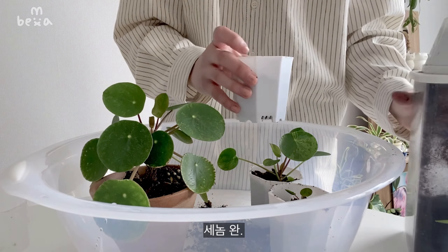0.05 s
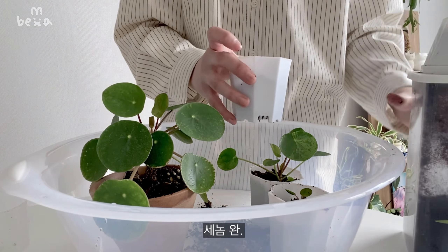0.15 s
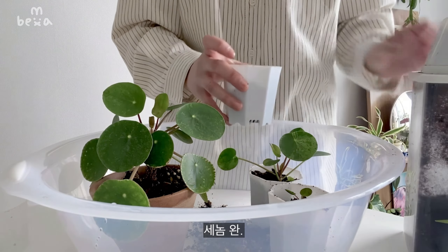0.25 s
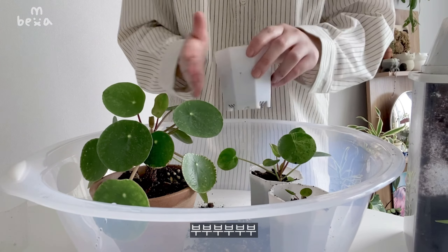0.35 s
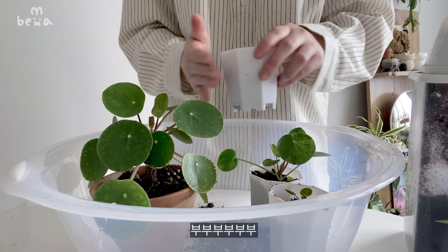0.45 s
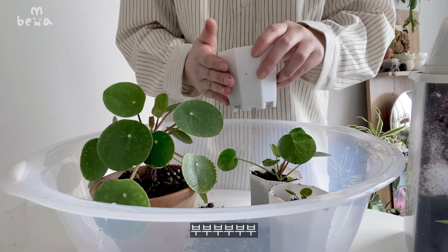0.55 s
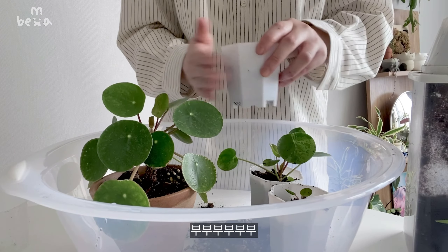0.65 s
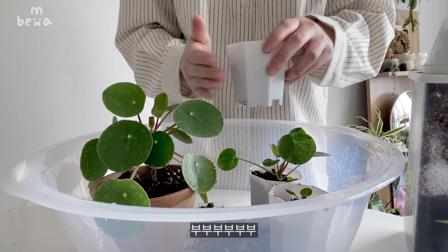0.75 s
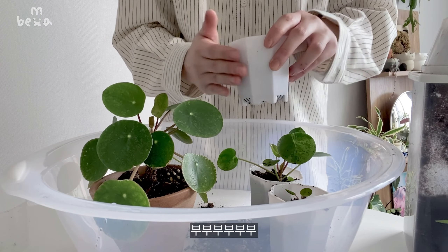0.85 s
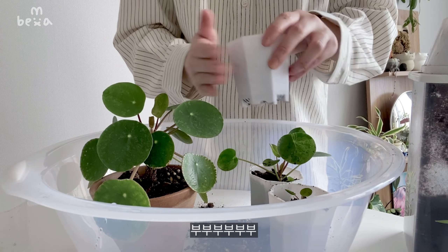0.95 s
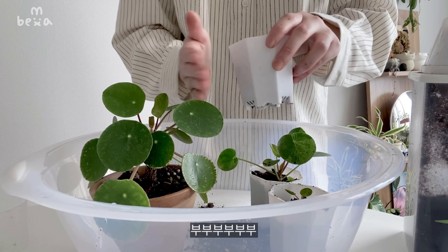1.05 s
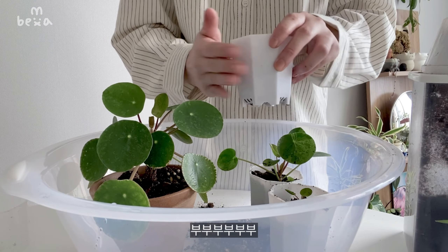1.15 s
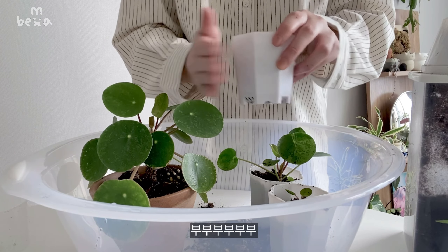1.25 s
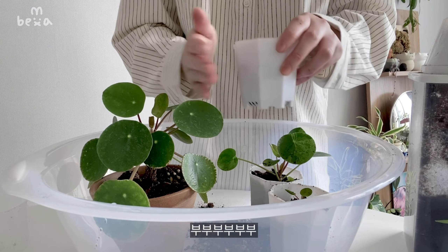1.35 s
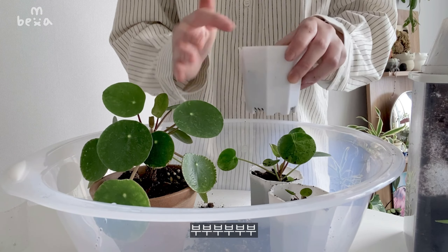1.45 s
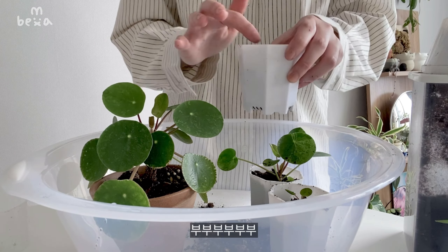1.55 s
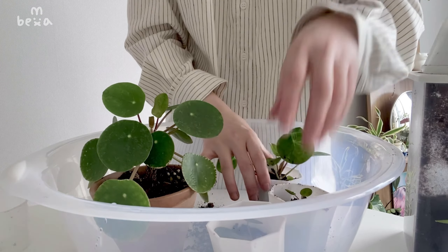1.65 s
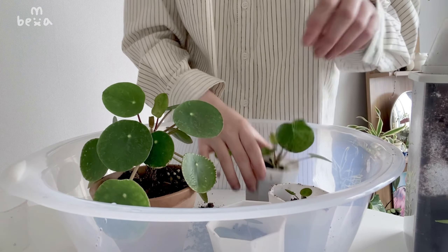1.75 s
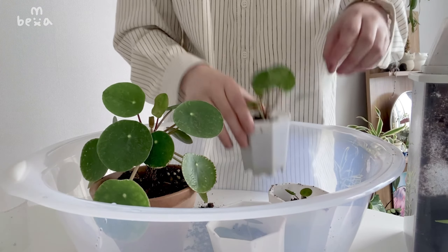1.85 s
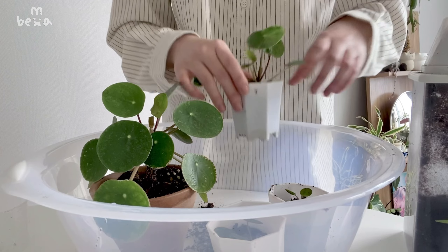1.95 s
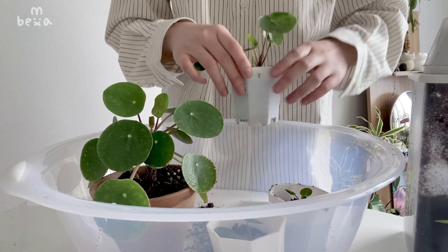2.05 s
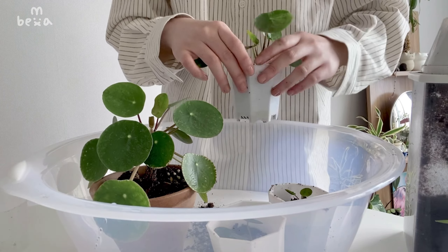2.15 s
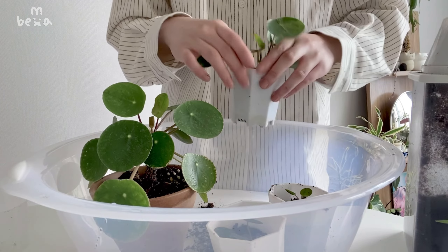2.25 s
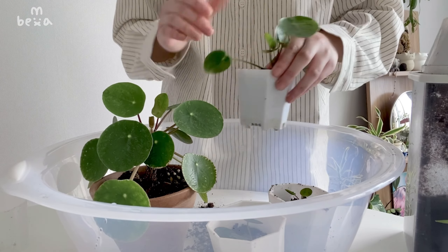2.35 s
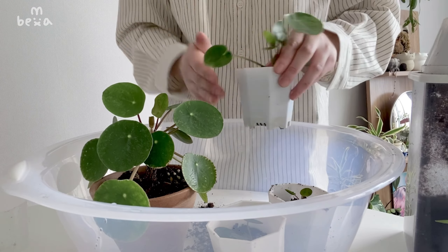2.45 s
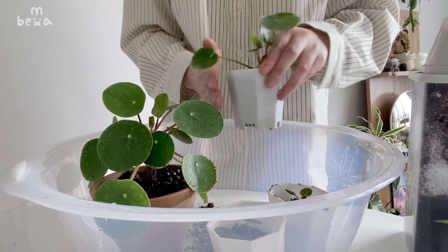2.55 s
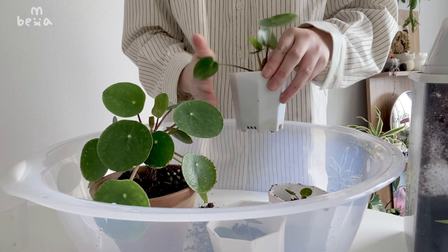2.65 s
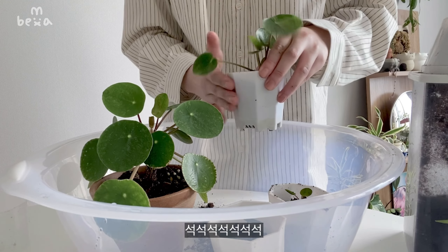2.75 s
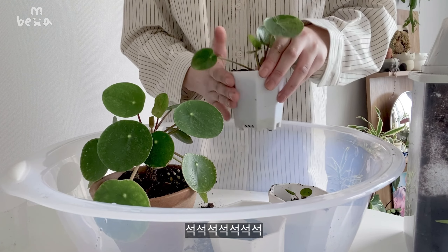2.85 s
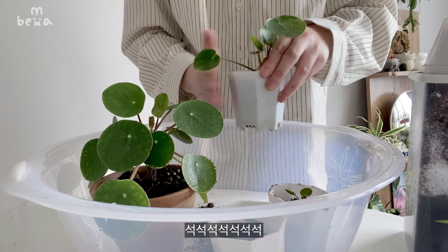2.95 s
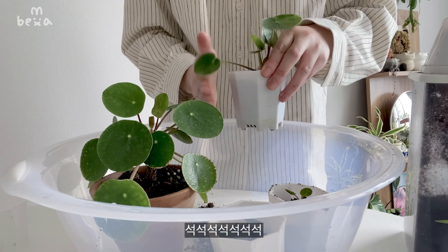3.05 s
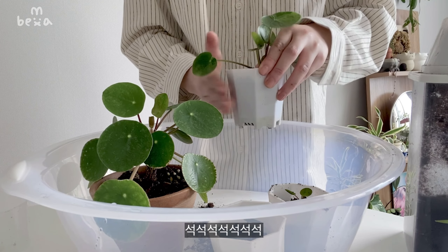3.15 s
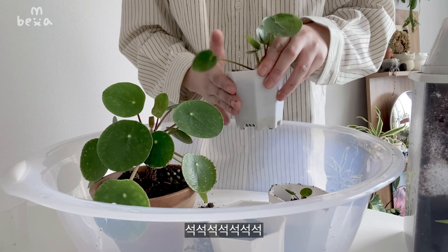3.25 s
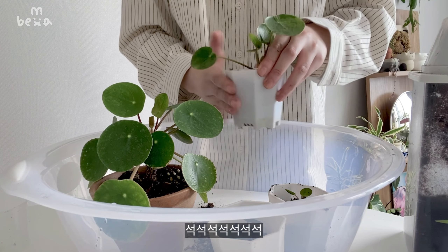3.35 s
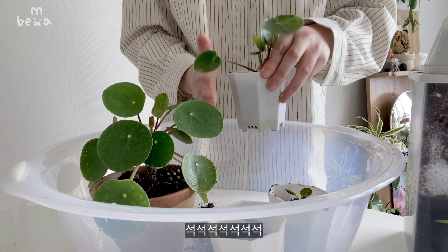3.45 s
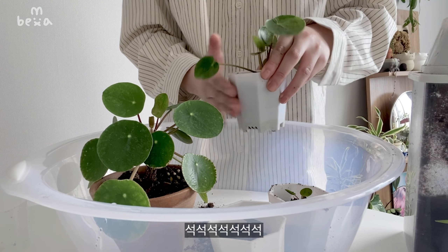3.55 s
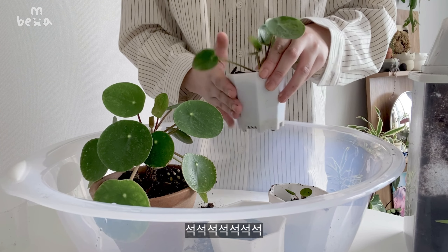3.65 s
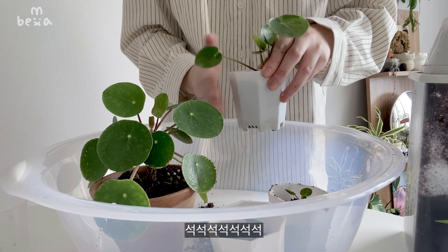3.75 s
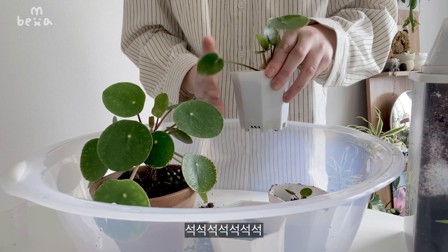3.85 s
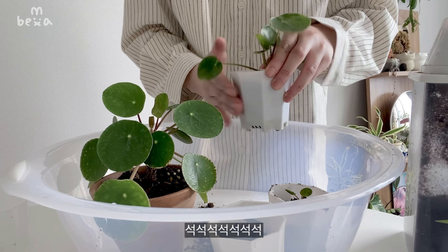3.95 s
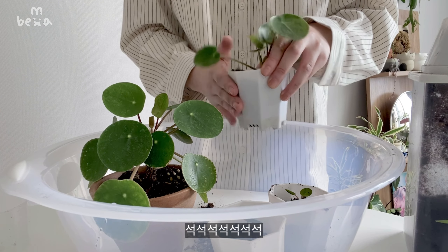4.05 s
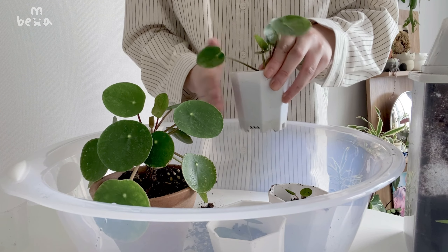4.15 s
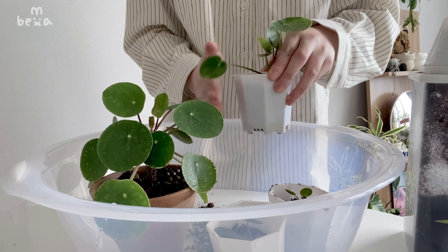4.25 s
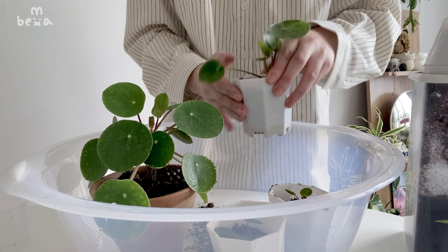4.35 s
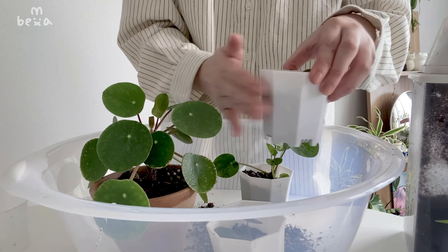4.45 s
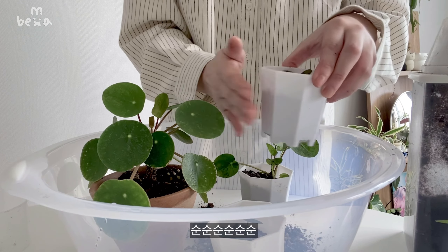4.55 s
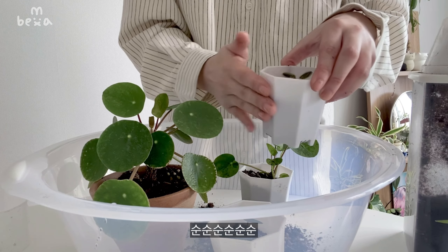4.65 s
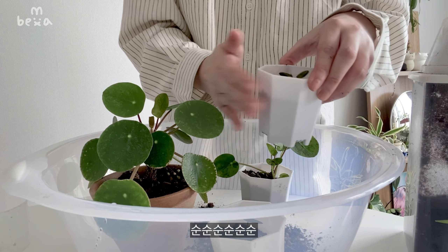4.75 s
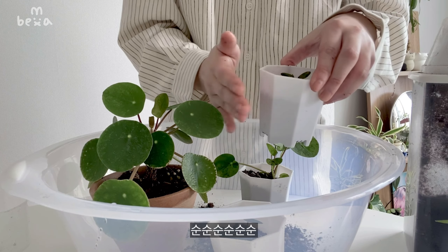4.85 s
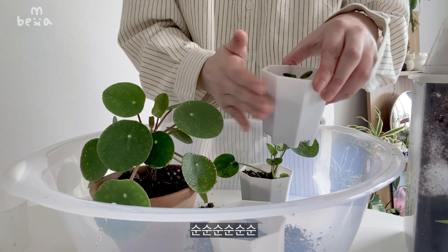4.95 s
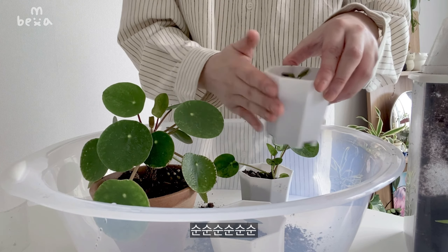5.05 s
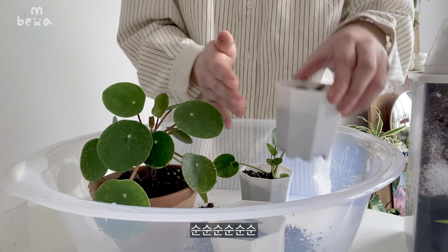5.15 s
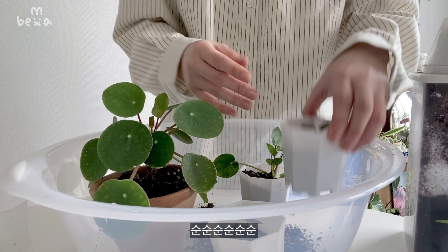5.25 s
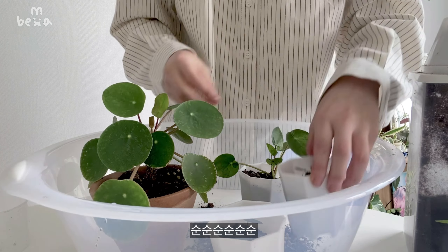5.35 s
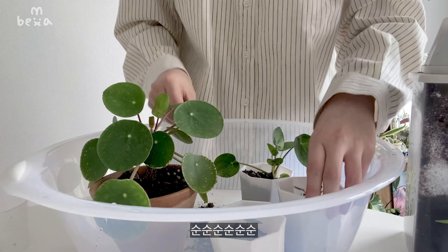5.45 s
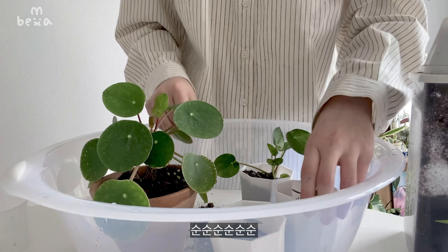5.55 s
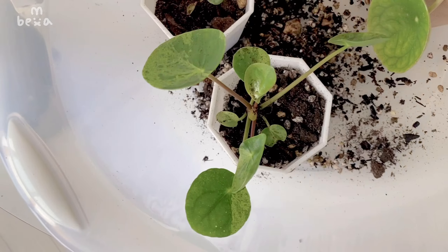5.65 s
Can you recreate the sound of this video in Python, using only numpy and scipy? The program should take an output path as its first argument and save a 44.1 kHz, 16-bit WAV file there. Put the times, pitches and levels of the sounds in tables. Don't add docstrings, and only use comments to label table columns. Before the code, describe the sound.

Hands tap small plastic plant pots in quick, even runs, dry soil rattling inside, with basin knocks before and a set-down thud after.

```python
import sys
import numpy as np
from scipy import signal
from scipy.fft import rfft, irfft
from scipy.io import wavfile
from scipy.ndimage import uniform_filter1d

SR = 44100
rng = np.random.default_rng(int(sys.argv[2]) if len(sys.argv) > 2 else 0)


def convert_level_to_amplitude(level_db):
    exponent = np.asarray(level_db, float) / 20
    return 10 ** exponent


def put_to_file(sound):
    columns = np.atleast_2d(sound).T
    safe = np.clip(columns, -1, 1)
    whole_steps = np.round(safe * 32767)
    wavfile.write(sys.argv[1], SR, whole_steps.astype(np.int16))


N = 250558
T = np.arange(N) / SR


def unit(x):
    return x / np.sqrt(np.mean(x ** 2))


def colour(x, shape):
    hz, db = np.transpose(shape)
    log_grid = np.log(np.linspace(1, SR / 2, 2049))
    cepstrum = irfft(np.interp(log_grid, np.log(hz), db) * np.log(10) / 20)
    cepstrum[1:2048] *= 2
    cepstrum[2049:] = 0
    response = irfft(np.exp(rfft(cepstrum)))
    return signal.fftconvolve(x, response / np.linalg.norm(response))[:len(x)]


def band(x, hz, width_hz):
    return signal.lfilter(*signal.iirpeak(hz, hz / width_hz, fs=SR), x)


def add(out, start_s, x):
    i = int(start_s * SR)
    out[i:i + len(x)] += x[:N - i]


def decay(t60_s, t):
    return convert_level_to_amplitude(-60 * t / t60_s)


def rise(rise_s, t):
    return np.clip(t / rise_s, 0, 1)


def ring(hz, t60_s, t):
    return np.sin(2 * np.pi * hz * t) * decay(t60_s, t)


def walk(rate_hz):
    k = int(SR / rate_hz)
    steps = np.repeat(rng.standard_normal(N // k + 1), k)
    return unit(uniform_filter1d(steps, k)[:N])


def ears(x, echo, apart, lead=6):
    left = np.roll(x, lead) + apart[0]
    right = np.roll(x, 2 * lead) * np.sqrt(1 - echo ** 2) + echo * x + apart[1]
    return np.array([left, right])


def reverb(x, t60_s, db):
    t = T[:SR // 2]
    tails = rng.standard_normal((2, len(t))) * decay(t60_s, t) * rise(0.01, t)
    tails /= np.linalg.norm(tails[0])
    return convert_level_to_amplitude(db) * signal.fftconvolve(x[None], tails, axes=1)[:, :N]


# (start_s, pitch_hz, level_db)
DRONE_PATH = [(0.0, 59.5, -58), (0.301, 55.5, -62), (0.56, 70.3, -62), (1.55, 71.3, -58),
              (1.738, 74.2, -64.5), (1.849, 62.6, -63.5), (1.972, 76.1, -60.5), (2.358, 76.4, -61.5),
              (2.48, 72.13, -72.5), (2.6, 74, -62), (2.83, 67.3, -57.5), (3.309, 67, -57.5),
              (3.4, 76.2, -58), (3.649, 72, -57.5), (3.86, 57, -57), (4.3, 61.2, -62), (4.65, 68.4, -58),
              (5.6, 72.9, -61.5)]
# (pitch_hz, width_hz)
WHINE_BAND = (1860, 70)
# (pitch_hz, level_db)
HISS_TONE = [(12, -36.5), (20, -24), (64, 2), (157, -11.5), (196, -6), (333, -20), (650, -19.5), (707, -20),
             (768, -15), (1130, -20.5), (1270, -25.5), (2930, -37.5), (3970, -37.5), (15600, -44)]
SCENE_HISS_DB = [0.1, 0.1, -1.6, 0.16, 0.3]
SCENE_STARTS = (0.4, 1.63, 2.7, 4.45)


def room_tone():
    start_s, hz, db = np.transpose(DRONE_PATH)
    throb = convert_level_to_amplitude(np.interp(T, start_s, db) + 3 * walk(12))
    pitch_hz = np.interp(T, start_s, hz) + 1.5 * walk(9)
    drone = np.sqrt(2) * throb * np.sin(2 * np.pi * np.cumsum(pitch_hz) / SR)
    drone = np.array([drone * convert_level_to_amplitude(-2.86), np.roll(drone, 30) * convert_level_to_amplitude(-5.0)])

    hiss = np.array([colour(rng.standard_normal(N), HISS_TONE) for _ in range(2)])
    hiss[1] = hiss[1] + band(hiss[0] - hiss[1], 60, 220)
    lift_db = np.take(SCENE_HISS_DB, np.digitize(T, SCENE_STARTS))
    hiss = convert_level_to_amplitude(-66.5 + lift_db + 1.3 * walk(7.4)) * hiss

    whine = [convert_level_to_amplitude(-86 + 4.2 * walk(4.3)) * unit(band(rng.standard_normal(N), *WHINE_BAND)) for _ in range(2)]
    return drone + hiss + whine


# (pitch_hz, level_db)
RUMBLE_TONE = [(40, -23.5), (120, -4), (300, 5), (800, -0.5), (1400, -7.5), (2500, -29.5), (4000, -44),
               (6000, -70.5), (16000, -71)]
# (pitch_hz, level_db)
CLICK_TONE = [(500, -11.5), (1500, 1.5), (4500, 0), (7000, -18), (16000, -25)]


def knocks(table, rumble_db, rumble_t60_s, push_s):
    body, rumble, click = np.zeros((3, N))
    t = T[:SR // 2]
    for start_s, db, hz, t60_s, click_db in table:
        push = np.sin(np.pi / 2 * rise(push_s, t)) ** 2
        add(body, start_s, convert_level_to_amplitude(db) * ring(hz, t60_s, t) * push)
        add(rumble, start_s, convert_level_to_amplitude(db + rumble_db) * decay(rumble_t60_s, t) * rng.standard_normal(len(t)))
        add(click, start_s, convert_level_to_amplitude(db + click_db) * decay(0.011, t) * rng.standard_normal(len(t)))
    return body + colour(rumble, RUMBLE_TONE) + colour(click, CLICK_TONE)


# (start_s, peak_db, pitch_hz, t60_s, click_db relative to the peak)
BASIN_KNOCKS = [(.001, -36, 193, 0.057, -28.5), (.004, -34, 625, 0.065, -31.5),
                (.010, -34, 1152, 0.042, -33), (.021, -23.5, 722, 0.019, -41),
                (.030, -37, 308, 0.048, -37.5), (.047, -32.5, 279, .05, -46),
                (.075, -31.5, 200, 0.02, -49.5), (.1180, -26, 559, 0.025, -38),
                (.1225, -28, 150, 0.04, -58), (.1295, -19.5, 761, 0.027, -49),
                (.1300, -43, 1244, 0.035, -31.5), (.1360, -21.5, 399, 0.04, -41),
                (.1240, -48, 136.4, 0.55, -48.5), (.158, -45, 412, 0.053, -39),
                (.192, -44.5, 213, 0.11, -34), (.258, -47, 299, 0.074, -22.5), (.297, -44, 380, 0.061, -34),
                (1.81, -55, 200, 0.047, -14), (2.325, -59, 228, .06, -12)]
EARLIER_KNOCK = [
    (0, -39.5, 340, .12, -23),
]


def basin_knocks():
    return knocks(BASIN_KNOCKS, -14.5, 0.092, 0.0017) + knocks(EARLIER_KNOCK, 5.0, 0.24, 0.0015)


# (start_s, peak_db, pitch_hz, t60_s)
CRUMB_TICKS = [(0.0044, -34, 2530, 0.014), (0.027, -69, 2770, 0.013), (0.06, -70, 2480, 0.03),
               (0.2642, -62, 2720, 0.05), (0.278, -64.5, 2970, 0.053), (0.4537, -45, 3400, 0.069),
               (0.4945, -45, 3900, 0.026), (0.635, -38.5, 3840, 0.039), (0.6544, -45.5, 2750, 0.044),
               (0.7726, -49, 3930, 0.03), (0.794, -55.5, 2612, 0.038), (1.062, -38, 3900, 0.035),
               (1.0881, -36, 3400, 0.02), (1.361, -37, 4640, 0.027), (1.7394, -63, 2850, 0.04),
               (1.817, -68.5, 3034, 0.071), (2.1003, -71, 3200, 0.029), (2.191, -70.5, 3925, 0.034),
               (2.292, -67, 3240, 0.033), (2.6643, -48.5, 3960, 0.018), (4.328, -54, 3750, 0.027),
               (4.56, -61, 2970, 0.022), (4.607, -54, 3400, 0.023), (4.7062, -56, 3664, 0.027),
               (4.8412, -46, 3400, 0.028), (4.8557, -49, 3470, 0.016), (5.2655, -57.5, 3510, 0.018)]


def ticks():
    out, t = np.zeros(N), T[:SR // 5]
    for start_s, db, hz, t60_s in CRUMB_TICKS:
        burst = rng.standard_normal(len(t)) * rise(0.088 * t60_s, t) * decay(t60_s, t)
        add(out, start_s, convert_level_to_amplitude(db + 13) * band(burst, hz, hz * 0.49))
    return out


# (start_s, effort_db)
HAND_MOVES = [(0.43, -100), (0.55, -94.5), (0.63, -68), (0.72, -84), (1.3, -79), (1.5, -90), (1.75, -94),
              (1.92, -85.5), (2.2, -93.5), (2.6, -100.5), (2.83, -79), (3.0, -88), (4.15, -82.5),
              (4.25, -67.5), (4.4, -90), (5.0, -78.5), (5.35, -81.5), (5.6, -90)]


def hand_effort_db():
    return np.interp(T, *np.transpose(HAND_MOVES), left=-110)


# (pitch_hz, level_db)
BODY_TONE = [(120, -25), (250, 10), (500, 2.5), (900, -3.5), (1400, -1.5), (2500, -47)]


def pot_body(shake, effort_db):
    force = convert_level_to_amplitude(effort_db) + convert_level_to_amplitude(-12) * shake
    return [force * convert_level_to_amplitude(5.25 * walk(31)) * colour(rng.standard_normal(N), BODY_TONE) for _ in range(2)]


def grains(scatter_db, share):
    size = convert_level_to_amplitude(scatter_db * np.minimum(rng.exponential(size=N), 5))
    clicks = (rng.random(N) < share) * size * rng.standard_normal(N)
    return unit(unit(clicks) + 1.2 * rng.standard_normal(N))


# (pitch_hz, level_db)
SOIL_TONE = [(300, -12), (600, -16), (1300, -12.5), (1850, -12), (3000, 0.5), (4500, -6.5), (6500, -14),
             (9000, -12), (12500, -23.5), (16000, -25)]


def rattling_soil(shake, effort_db):
    leaf_hiss = convert_level_to_amplitude(-89.5 + 0.43 * (effort_db + 79.5))
    stir = (shake + leaf_hiss) * convert_level_to_amplitude(2.2 * walk(60) + 0.87 * walk(22.196))
    return [stir * colour(grains(2.8, 0.027), SOIL_TONE) for _ in range(3)]


# (pitch_hz, width_hz, level_db)
WALL_RINGS = [(2410, 260, 0.5), (2750, 93, -4), (3160, 240, -1.5), (3650, 150, -3), (4150, 200, -5.5)]


def rung_wall(rattle):
    return convert_level_to_amplitude(-1) * sum(convert_level_to_amplitude(db) * band(rattle, hz, width_hz / 2) for hz, width_hz, db in WALL_RINGS)


# (start_s, crack_db, wall_ring_db relative to the crack, thump_db, soil_shake_db)
FIRST_POT_TAPS = [
    (0.6046, -48, -13, -50, -56.5),
    (0.7452, -34.5, -9.5, -40, -58),
    (0.8932, -31, -14, -41.5, -51),
    (1.0215, -44.5, -8.5, -43.5, -50.5),
    (1.1771, -27, -14.5, -42.5, -48.5),
    (1.3307, -45, -4.5, -45.5, -53.5),
]
SECOND_POT_TAPS = [(2.62, -48, -24, -88, -60.5), (2.762, -32, -14.5, -44.5, -51),
                   (2.8891, -31.5, -14.5, -53, -56.5), (3.0183, -36, -16, -41, -48),
                   (3.1519, -38.5, -14, -42, -49), (3.2864, -34, -12, -42, -52),
                   (3.4157, -45, -18, -44, -50), (3.5492, -45, -8.5, -48.5, -49.5),
                   (3.682, -26.5, -15, -38, -51), (3.818, -25, -10.5, -39.5, -51.5),
                   (3.955, -34.5, -26.5, -42.5, -51.5), (4.092, -24.5, -11.5, -40.5, -50),
                   (4.2318, -32.5, -24, -46.5, -57), (4.3581, -27.5, -17.5, -40, -54)]
THIRD_POT_TAPS = [
    (4.539, -38, -15, -42, -59),
    (4.6817, -30.5, -33, -48, -56.5),
    (4.8232, -31.5, -19, -45.5, -59.5),
    (4.9685, -31.5, -28, -52, -52),
    (5.1001, -26, -19, -39, -53),
]
# (wall_ring_hz, thump_hz, palm_pat_db relative, snap_db relative, snap_hz)
POT_VOICES = [
    (1365, 320, -0.5, -3.5, 7060),
    (1255, 234, -4, -13.5, 4460),
    (1400, 343, -4, -8, 3650),
]
# (pitch_hz, level_db)
FIRST_CRACK = [(940, -33), (1600, -5), (2170, -30), (3210, 7.5), (4310, -3.5), (4780, -13), (8460, -4.5),
               (10500, -11.5), (13400, -12.5), (15600, -29)]
SECOND_CRACK = [(940, -23), (1600, -6.5), (1950, -18), (3140, 0.5), (4470, -7.5), (5310, -8), (8220, -6),
                (10200, -14.5), (13900, -12.5), (15600, -38.5)]
THIRD_CRACK = [(940, -40.5), (1600, -26), (2860, -3), (4970, 8), (6240, -1), (9490, -3), (10600, -14),
               (12700, -9), (14700, -30), (15600, -28.5)]
POT_SWAPS = (2, 4.45)


def taps():
    crack = np.zeros((3, N))
    snap, wall, shake = np.zeros((3, N))
    t = T[:SR // 2]
    touch = rise(0.00053, t) ** 2 * (decay(0.02, t) + convert_level_to_amplitude(-26.5) * decay(0.1, t))
    rattle = decay(0.29, t)
    trickle = convert_level_to_amplitude(-22.5) * decay(0.99, t) * (1 - t / t[-1])
    tables = FIRST_POT_TAPS, SECOND_POT_TAPS, THIRD_POT_TAPS
    for table, (wall_hz, thump_hz, pat_db, snap_db, snap_hz) in zip(tables, POT_VOICES):
        for start_s, db, ring_db, thump_db, soil_db in table:
            grip = 1 + 0.13 * rng.standard_normal(size=3)
            spot_hz = wall_hz * (1 + 0.044 * rng.standard_normal())
            for path in crack:
                rough = rng.laplace(size=len(t)) * convert_level_to_amplitude(0.82 * rng.standard_normal(len(t)))
                add(path, start_s - 0.0008, convert_level_to_amplitude(db - 9) * touch * rough)
            burst = band(decay(0.0035, t) * rng.laplace(size=len(t)), snap_hz * grip[2], 3200)
            add(snap, start_s + 0.0015, convert_level_to_amplitude(db + snap_db + 16) * burst)
            rings = ring(spot_hz, 0.014, t) + 0.57 * ring(spot_hz * 0.96 * grip[0], 0.031, t)
            add(wall, start_s, convert_level_to_amplitude(db + ring_db + 5.5) * rise(0.0008, t) * rings)
            thump = convert_level_to_amplitude(pat_db) * ring(125 * grip[1], 0.043, t) + ring(thump_hz * grip[2], 0.02, t)
            add(wall, start_s + 0.002, rise(0.00087, t) * convert_level_to_amplitude(thump_db) * thump)
            add(shake, start_s, convert_level_to_amplitude(soil_db) * rise(0.0013, t) * (rattle + trickle))
    held = np.searchsorted(POT_SWAPS, T)
    tones = FIRST_CRACK, SECOND_CRACK, THIRD_CRACK
    crack = [sum(colour(path * (held == k), tone) for k, tone in enumerate(tones)) for path in crack]
    return crack[0] + snap + wall, np.array(crack[1:]), shake


# (start_s, peak_db, pitch_hz, t60_s, click_db relative to the peak)
POT_LANDING = [
    (5.5302, -32, 1690, 0.018, -7),
    (5.5305, -34.5, 846, .02, -7.5),
    (5.5325, -17, 342, 0.022, -58),
    (5.542, -48.5, 308, 0.067, -52),
    (5.565, -45.5, 402, 0.037, -18),
    (5.585, -45.5, 459, 0.12, -54.5),
]


def set_down():
    return knocks(POT_LANDING, -28, 0.097, 0.0018)


# (fade_out_s, silent_from_s, back_at_s, fade_in_s)
SCENE_CHANGES = [
    (0.048, 0.3507, 0.41, 0.13),
    (0.097, 1.613, 1.656, 0.11),
    (0.094, 4.421, 4.472, 0.11),
    (0.037, 5.604, 5.576, 0.19),
]


def fades():
    gain = np.ones(N)
    for out_s, silent_s, back_s, in_s in SCENE_CHANGES:
        sink = convert_level_to_amplitude(-8.5 * np.clip(1 - (silent_s - T) / out_s, 0, 1))
        swell = np.clip((T - back_s) / in_s, 1e-3, 1) ** 1.48
        gain = gain * np.where(T < silent_s, sink, swell)
    return uniform_filter1d(gain, size=200)


def scene():
    tone, basin, crumbs = room_tone(), basin_knocks(), ticks()
    effort_db = hand_effort_db()
    hits, scattered, shake = taps()
    soil = rattling_soil(shake, effort_db)
    body = pot_body(shake, effort_db)
    foot = set_down()

    pot = hits + crumbs + rung_wall(soil[0])
    apart = band(1.19 * np.array(soil[1:]) + 1.5 * scattered, 2900, 7200) + body
    near = ears(pot + soil[0], echo=0.12, apart=apart) * convert_level_to_amplitude([[0.8], [-0.8]])
    aside = np.array([np.roll(basin, 16) * convert_level_to_amplitude(4.1), basin * convert_level_to_amplitude(0.5)])
    middle = foot * convert_level_to_amplitude([[-0.4], [0.4]]) + reverb(foot, 0.33, -8.5)
    middle = middle * np.clip((SCENE_CHANGES[-1][1] - T) / 0.0047 + 1, 0, 1)
    return near + aside + middle + reverb(pot, 0.31, -10) + reverb(basin, 0.34, -7.5) + tone


def band_limit(x):
    return signal.sosfilt(signal.butter(12, 15710, fs=SR, output="sos"), x)


# (pitch_hz, level_db)
MIC_TONE = [(20, -4.5), (45, 2), (9000, -3.5), (10500, -3), (12500, 2), (14500, -7.5), (16500, -12)]
# (pitch_hz, level_db)
THINNED_TONE = [(20, 0), (9500, 0), (9850, -26), (11000, -26), (11400, 0), (14300, 0), (14800, -24),
                (20000, -30)]


def record(dry):
    full = np.array([colour(side, MIC_TONE) for side in dry]) * convert_level_to_amplitude(-3.5) * fades()
    thinned = np.array([colour(side, THINNED_TONE) for side in full]) * convert_level_to_amplitude(-2.6)
    edge = np.abs(np.diff(full.sum(axis=0), prepend=0))
    jump = uniform_filter1d(edge, size=256) / (uniform_filter1d(edge, size=4096) + 1e-12)
    attack = np.clip(jump - 1.6, 0, 1)
    mix = thinned + attack * (full - thinned)
    return band_limit(mix)


dry = scene()
out = record(dry)
put_to_file(out)
```